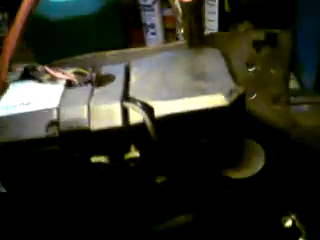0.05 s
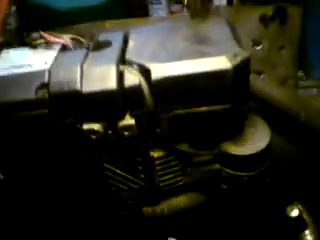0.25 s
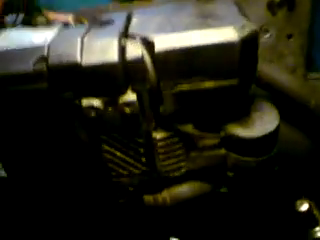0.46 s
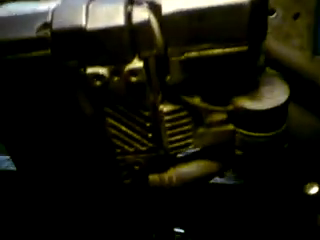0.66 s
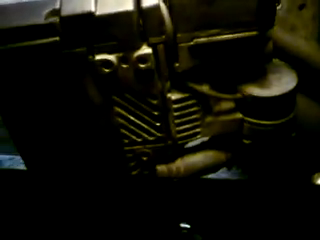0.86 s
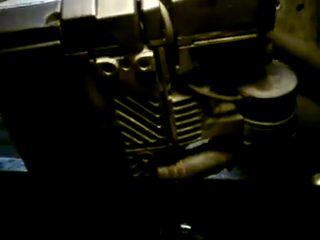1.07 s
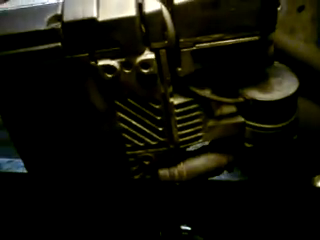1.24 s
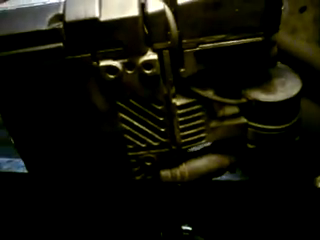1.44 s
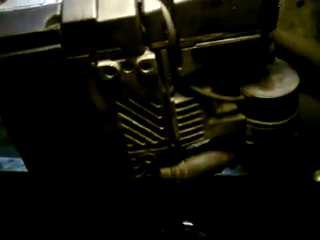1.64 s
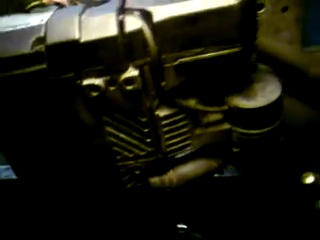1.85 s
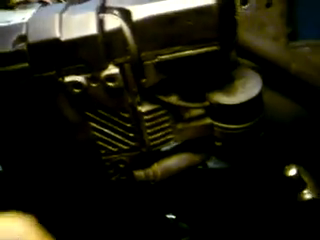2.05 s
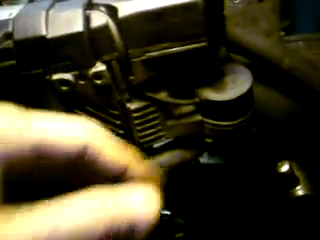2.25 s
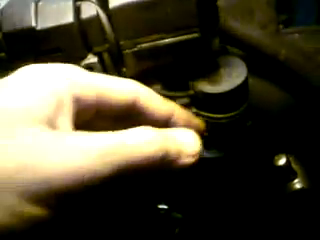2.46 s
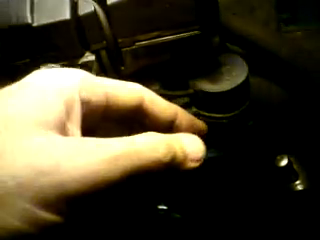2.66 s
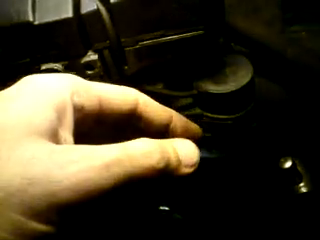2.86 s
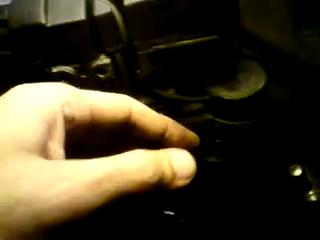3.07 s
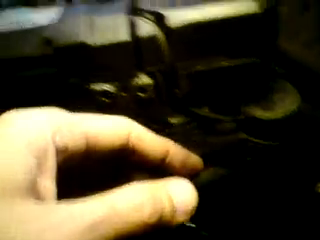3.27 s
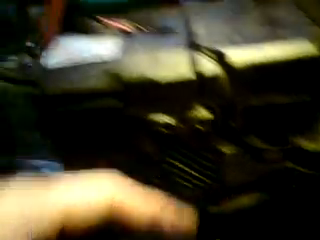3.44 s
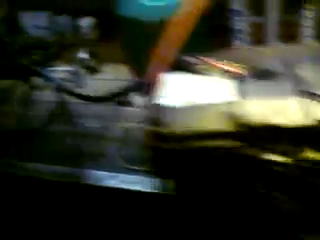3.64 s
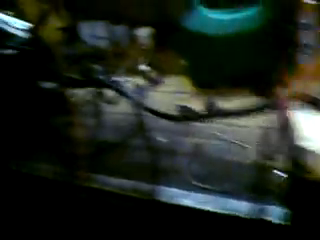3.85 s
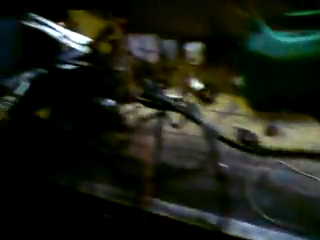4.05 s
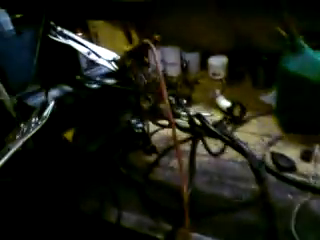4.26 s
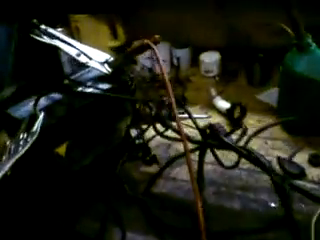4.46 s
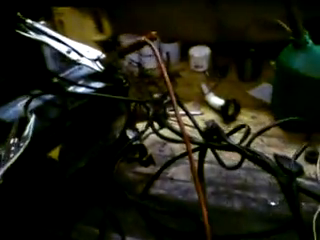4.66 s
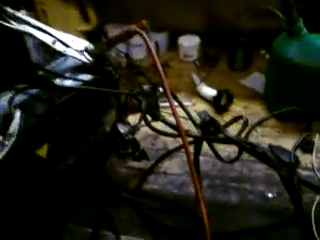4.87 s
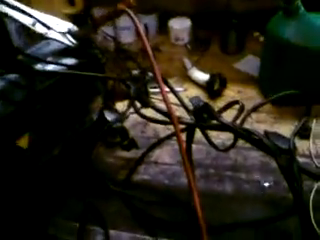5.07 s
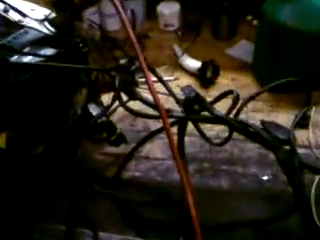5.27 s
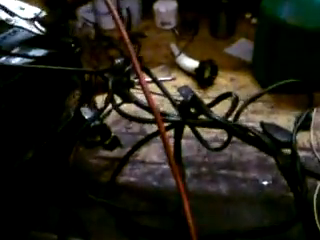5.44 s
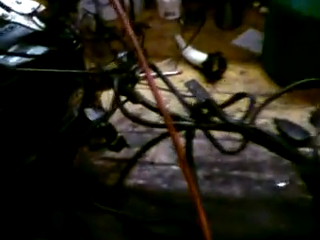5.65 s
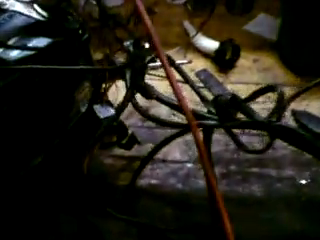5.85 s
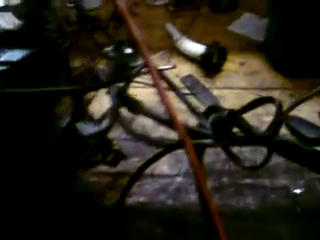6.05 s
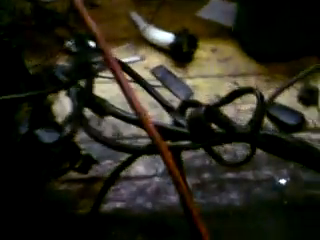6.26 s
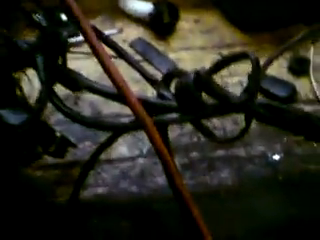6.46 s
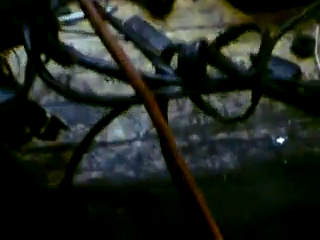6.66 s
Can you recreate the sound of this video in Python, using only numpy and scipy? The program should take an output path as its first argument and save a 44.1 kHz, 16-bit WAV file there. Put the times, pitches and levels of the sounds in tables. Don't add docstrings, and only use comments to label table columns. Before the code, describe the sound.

A small fuel-burning heater whines steadily over a rushing flame close by, its pitch stepping slightly down, then the sound drops duller as the phone swings away.

```python
import sys
import numpy as np
from scipy import signal
from scipy.io import wavfile
from scipy.ndimage import uniform_filter1d

SR = 44100
rng = np.random.default_rng(int(sys.argv[2]) if len(sys.argv) > 2 else 0)


def invert_db(x):
    u = np.asarray(x, float) / 20
    return 10 ** u


def transcribe(signal):
    frames = np.atleast_2d(signal).T
    limited = np.clip(frames, -1, 1)
    pcm = np.round(limited * 32767).astype(np.int16)
    wavfile.write(sys.argv[1], SR, pcm)


N = 295911
HOP = 256
SWING_S = (3.84, 4.13)
COIL_HZ = 1965.2
SETTLED_S = 4.15
SINK_DB_PER_S = 0.21

# (time [s], speed lost [turns/s], speed won back [turns/s])
PUMP_STROKES = [
    (0.511, 0.359, 0.44),
    (1.152, 1.105, -0.018),
    (1.78, 0.682, 0.507),
    (2.405, 0.745, 0.163),
    (3.05, 0.463, 0.147),
    (3.691, 0.812, -0.231),
    (4.356, 1.091, 0.792),
    (5.035, 0.692, 1.104),
    (5.69, 0.727, -0.327),
    (6.36, 0.509, -0.369),
]
# (time [s], level [dB])
BLADE_LEVEL = [(0.0, -36), (0.66, -35.5), (1.12, -41.8), (1.16, -46), (1.7, -44.8), (1.77, -49.5),
               (2.4, -39.5), (2.66, -43), (3.21, -41.9), (3.75, -31.9), (4.03, -34.6), (4.26, -42),
               (4.36, -60), (4.45, -46.9), (4.67, -43.5), (5.22, -40), (5.87, -50.5), (6.71, -44.5)]
# (time [s], half length [s], change [dB])
BLADE_NULLS = [
    (1.28, .04, -4),
    (1.86, .03, -3),
    (1.99, 0.034, 0),
    (5.02, 0.016, 2.5),
    (5.09, .03, -3),
    (5.4, 0.043, -4),
    (5.92, .04, -6),
    (6.07, .05, 1),
    (6.215, 0.037, -4),
]
# (time [s], half length [s], change [dB])
OCTAVE_NULLS = [
    (1.04, 0.38, -3),
    (2.04, 0.11, -11),
    (3.775, 0.056, -5),
    (4.19, 0.074, -5),
    (4.63, 0.068, -5.5),
    (5.275, 0.05, -8),
    (5.492, 0.064, -3),
    (5.74, 0.02, -11.8),
    (6.143, 0.081, -14.0),
]
# (time [s], half length [s], change [dB])
MOTOR_NULLS = [
    (0.0, 0.33, 8.5),
    (0.03, 0.13, -23),
    (0.95, 0.11, -11),
    (3.37, 0.079, -9.4),
    (3.61, 0.07, 6),
    (4.08, 0.087, -7),
    (4.68, 0.06, -13),
    (6.09, 0.3, -10),
]
# (start [s], end [s], change [dB])
BEAM_LOSSES = [
    (3.4, 4.5, -12),
    (5.05, 5.5, -12),
]
WEAK_ORDERS = (9, 10, 11, 13, 15, 16, 17, 18, 21, 22, 23, 25, 26, 27, 31, 32, 35, 37, 40, 41, 43, 48, 53,
               54, 55, 56, 57, 64)
# (above [dB], beside [dB], far away [dB])
WEAK_LEVELS = [(-58, -59, -73), (-62, -63, -68), (-53, -55, -65), (-54, -56, -66), (-52, -54, -71),
               (-63, -60, -64), (-55, -62, -70), (-63, -61, -69), (-59, -63, -62), (-64, -65, -63),
               (-63, -63, -59), (-62, -68, -61), (-72, -75, -66), (-66, -65, -75), (-58, -62, -75),
               (-69, -66, -73), (-60, -58, -75), (-65, -63, -69), (-69, -66, -72), (-74, -73, -73),
               (-81, -80, -78), (-82, -85, -92), (-82, -89, -86), (-84, -84, -84), (-82, -82, -85),
               (-80, -80, -81), (-80, -79, -92), (-83, -85, -88)]
# (time [s], level [dB])
COIL_LEVEL = [(0.0, -35.5), (0.21, -33.5), (0.66, -38), (2.33, -38.4), (2.66, -47.5), (3.06, -44.5),
              (3.57, -35), (3.87, -40.5), (4.06, -40), (4.31, -57.1), (4.91, -46.5), (5.34, -52.6),
              (5.45, -44.9), (5.61, -49), (5.66, -43.5), (6.03, -59), (6.4, -49.5), (6.71, -37)]
# (time [s], half length [s], change [dB])
COIL_NULLS = [
    (2.53, .03, 2),
    (4.19, .03, -5),
    (4.45, 0.036, 5),
    (4.52, .03, -4),
    (5.79, 0.035, -1),
    (5.92, .04, 5.5),
    (6.05, .04, -10),
    (6.15, .05, 5),
    (6.27, .03, -5),
]
# (time [s], half length [s], change [dB])
THIRD_NULLS = [
    (0.41, 0.08, 10),
    (1.31, 0.24, 10.5),
    (2.01, 0.08, 8.0),
    (3.41, 0.13, 10.5),
    (3.66, 0.07, -7),
    (4.18, 0.41, 9.5),
    (4.69, 0.12, -12.5),
    (5.08, 0.036, -8.4),
    (5.94, 0.047, -15),
    (6.62, 0.09, 8),
]
# (time [s], pitch [Hz])
PUMP_PITCH = [(0, 2922), (1, 2918), (1.5, 2911), (3, 2905), (6.71, 2900)]
# (frequency [Hz], density [dB])
NEAR_SPECTRUM = [(18, -57), (30, -56), (131, -5.5), (240, -8), (479, -5.5), (938, -11.5), (1510, -8.5),
                 (1610, -8), (1830, -5), (2000, -0.5), (2590, -18), (2830, -11.5), (4270, -7.5),
                 (4860, -18.5), (5300, -63), (6890, -85), (11700, -120)]
# (frequency [Hz], width [Hz], change [dB])
CASING_RESONANCES = [(232, 27, -7), (680, 40, -2.5), (1357, 110, 4), (2240, 380, 0.5), (2593, 100, 3),
                     (2650, 210, -2), (2880, 200, -3), (3550, 100, -6.5), (4200, 110, 1)]
# (frequency [Hz], density [dB])
FAR_SPECTRUM = [(10, -31.5), (60, -27.5), (110, -12), (210, -4), (470, -12), (620, -12), (800, -17.5),
                (1000, -19), (1250, -6.5), (2100, -9.5), (2600, -17), (3150, -15.5), (3750, -19.5),
                (4250, -15), (4900, -20.5), (5300, -54)]
# (frequency [Hz], density [dB])
FIZZ_SPECTRUM = [(4300, -35), (5000, -2), (5400, -2.5), (5700, -5.5), (5950, -0.5), (6400, -6.5),
                 (6800, -3), (7300, -5), (7550, -6), (7900, -4.5), (8300, -14.5), (8600, -24.5),
                 (9100, -45.5)]


def blower(turns, t):
    blade_db = curves(BLADE_LEVEL, t)[0] + spotted(t, BLADE_NULLS)
    out = tone(19 * turns, blade_db, 0.7)
    out += tone(38 * turns, heard(t, (-46.5, -54), OCTAVE_NULLS), 0.7)
    beamed_db = -44 + sum(db * ramp(t, start, end) for start, end, db in BEAM_LOSSES)
    out += tone(14 * turns, beamed_db, 1.5)
    out += tone(24 * turns, heard(t, (-57.3, -52.5), MOTOR_NULLS), 1.5)
    out += tone(36 * turns, heard(t, (-50, -62.5)), 1.5)
    tip_down_db = -6.5 * ramp(t, 5.4, 6.3)
    for order, (above_db, beside_db, far_db) in zip(WEAK_ORDERS, WEAK_LEVELS):
        db = np.interp(t, (1.2, 2.6, 3.8, 4.3), (above_db, beside_db, beside_db, far_db))
        db += tip_down_db * (22 <= order <= 26)
        out += tone(order * turns, db + 1.2 * slow(2), 2.0)
    return out


def shaft(t):
    pull_s, regain_s = 0.043, 0.45
    jolt_turns, jolt_s = 0.15, 0.04
    speed = 119.41 + 0 * t
    for stroke_s, lost, regained in PUMP_STROKES:
        before = np.exp(np.minimum(t - stroke_s, 0) / pull_s)
        after = np.maximum(t - stroke_s, 0)
        speed += regained * (1 - np.exp(-after / regain_s)) - lost * before
        speed -= jolt_turns * before ** 2 * np.exp(-after / jolt_s)
    return speed


def near_rush(t, hz):
    casing_db = sum(db * bump(hz, f, width) for f, width, db in CASING_RESONANCES)
    casing_db -= 9 * bump(hz, 2640, 45)
    near_db = -27 - 31 * ramp(t, 3.38, 4.7) ** 2.33
    hollow_db = -8 * (1 - ramp(t, 0, 0.64)) * bump(hz[:, None], 3270, 600)
    intake_db = 2 + hollow_db - 3 * ramp(t, 3.6, 4.1)
    intake_band = np.clip((hz - 2300) / 700, 0, 1)[:, None]
    return noise(read(NEAR_SPECTRUM, hz) + casing_db, invert_db(near_db + intake_band * intake_db), 0.6, 1.3)


def windings(t):
    first_db = curves(COIL_LEVEL, t)[0] + spotted(t, COIL_NULLS)
    third_db = heard(t, (-71.5, -64.5), THIRD_NULLS)
    pump_db = -52 - 24 * (1 - ramp(t, 0, 0.85) + ramp(t, 2.9, 4.6))
    pump_turns = np.cumsum(curves(PUMP_PITCH, t)[0]) / SR
    coil = tone(COIL_HZ * t, first_db, 0.4) + tone(3 * COIL_HZ * t, third_db, 1.5)
    return coil + tone(pump_turns, pump_db, 0.5)


def far_rush(t, hz):
    sinking_s = np.maximum(t - SETTLED_S, 0)
    far_db = -46.5 + 12.5 * ramp(t, 3.6, SETTLED_S) - SINK_DB_PER_S * sinking_s
    low_hz, high_hz = 255 + 40 * sinking_s, 1483 + 50 * sinking_s
    dip_db = 13.5 * (0.4 + 0.6 * ramp(t, 4.1, 6))
    dips = bump(hz[:, None], low_hz, 45) + 0.99 * bump(hz[:, None], high_hz, 150)
    return noise(read(FAR_SPECTRUM, hz), invert_db(far_db - dip_db * dips), 0.7, 1.9)


def fizz(t, hz):
    fizz_db = -49 - 7 * ramp(t, 4.05, 4.55) - SINK_DB_PER_S * np.maximum(t - SETTLED_S, 0)
    return noise(read(FIZZ_SPECTRUM, hz), invert_db(fizz_db) * np.ones((513, 1)), 1.0, 2.0)


def rush(turns):
    hz = np.fft.rfftfreq(1024, 1 / SR)
    t = np.arange(N // HOP + 5) * HOP / SR
    throb = 1 + 0.09 * np.cos(2 * np.pi * turns) + 0.035 * np.cos(4 * np.pi * turns)
    return (near_rush(t, hz) + far_rush(t, hz)) * throb + fizz(t, hz)


def heard(t, ends_db, spots=()):
    beside_db, far_db = ends_db
    return beside_db + (far_db - beside_db) * ramp(t, *SWING_S) + spotted(t, spots)


def spotted(t, spots):
    return sum(db * bump(t, s, half) for s, half, db in spots)


def tone(turns, db, waver_db):
    level = np.sqrt(2) * invert_db(db + waver_db * slow(25))
    return level * np.cos(2 * np.pi * (turns + rng.random()))


def noise(colour_db, shape, patchy_db, ripple_db):
    real, imag, patches, ripple = rng.standard_normal((shape.shape[1], 513, 4)).T
    patches = evened(smoothed(patches, 8, 16))
    ripple = evened(smoothed(ripple, 2, 170))
    ripple = ripple * np.clip(np.arange(513) / 24, 0.3, 1)[:, None]
    gain = invert_db(colour_db) / np.sqrt(np.mean(invert_db(colour_db) ** 2))
    drift = invert_db(patchy_db * patches + ripple_db * ripple)
    z = (real + 1j * imag) * gain[:, None] * drift * shape / 64
    return signal.istft(z, nperseg=1024, noverlap=1024 - HOP)[1][:N]


def slow(rate_hz):
    width = max(int(SR / 32 / rate_hz), 2)
    coarse = rng.standard_normal(N // 32 + 2)
    coarse = evened(uniform_filter1d(uniform_filter1d(coarse, width), width))
    return np.interp(np.arange(N) / 32, np.arange(len(coarse)), coarse)


def smoothed(x, bins, frames):
    return uniform_filter1d(uniform_filter1d(x, size=bins, axis=0), size=frames, axis=1)


def evened(x):
    return x / np.sqrt(np.mean(abs(x) ** 2) + 1e-30)


def read(points, hz):
    f, value = np.transpose(points)
    return np.interp(np.log(hz + 1), np.log(f + 1), value)


def curves(rows, t):
    s, *columns = np.transpose(rows)
    return [np.interp(t, s, c) for c in columns]


def bump(x, centre, width):
    return np.exp(-0.5 * ((x - centre) / width) ** 2)


def ramp(t, start, end):
    return np.clip((t - start) / max(end - start, 1e-3), 0, 1)


def scene():
    t = np.arange(N) / SR
    turns = np.cumsum(shaft(t)) / SR
    return (blower(turns, t) + windings(t) + rush(turns))[None]


def top_cut(x):
    return signal.sosfilt(signal.butter(12, 9030, fs=SR, output="sos"), x)


def record(dry):
    hz, t, z = signal.stft(dry[0], SR, window="cosine", nperseg=4096)
    power_db = 10 * np.log10(smoothed(abs(z) ** 2, 2, 3) + 1e-20)
    usual_db = smoothed(power_db, 75, 9)
    bands = rng.standard_normal((len(hz) // 14 + 1, len(t)))
    bands = np.repeat(evened(uniform_filter1d(bands, size=3, axis=1)), 14, axis=0)[:len(hz)]
    treble = np.clip((hz - 4850) / 250, 0, 1)[:, None]
    treble_shape_db = 1.2 * bump(hz, 5300, 300) - 7 * bump(hz, 8000, 220) - 0.3 * (hz > 8400)
    treble_db = treble * (11.2 + 1.0 * bands + treble_shape_db[:, None])
    bass_db = -30 * (hz < 120)[:, None]
    threshold_db = usual_db - 10 + 1.2 * bands + treble_db + bass_db
    kept = z * np.maximum(power_db > threshold_db, invert_db(-40))
    mix = signal.istft(kept, SR, window="cosine", nperseg=4096)[1][None, :N]
    return top_cut(mix)


dry = scene()
out = record(dry)
transcribe(out)
```